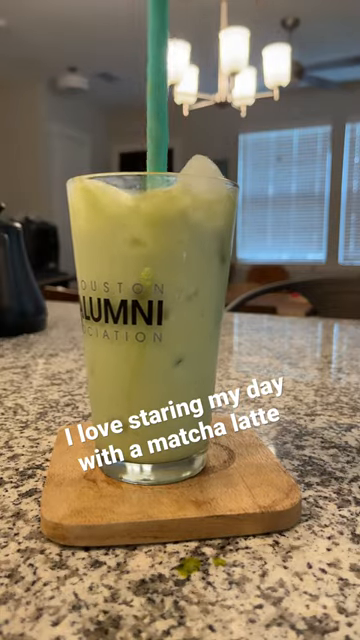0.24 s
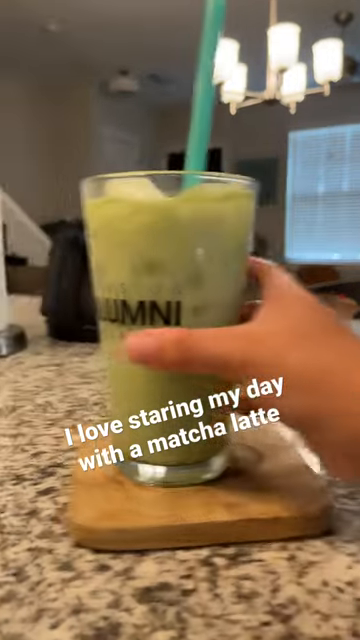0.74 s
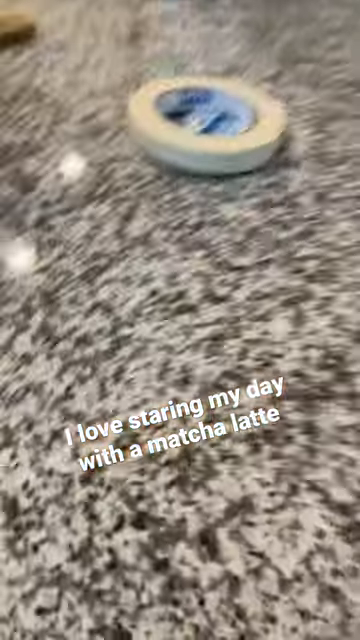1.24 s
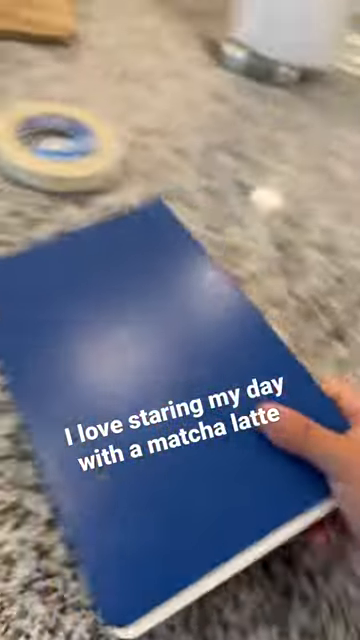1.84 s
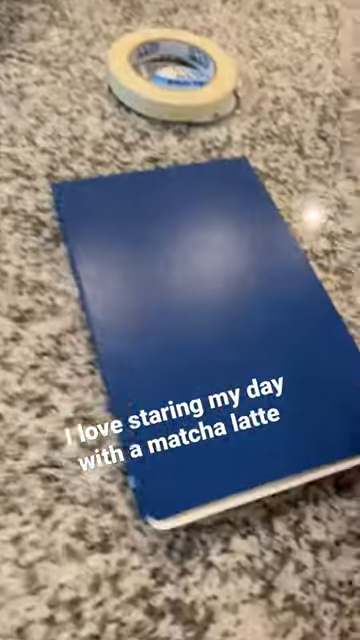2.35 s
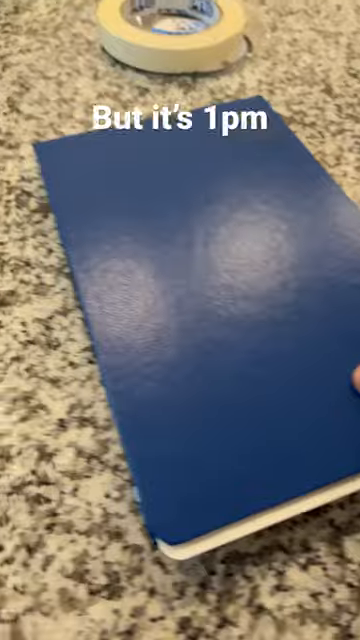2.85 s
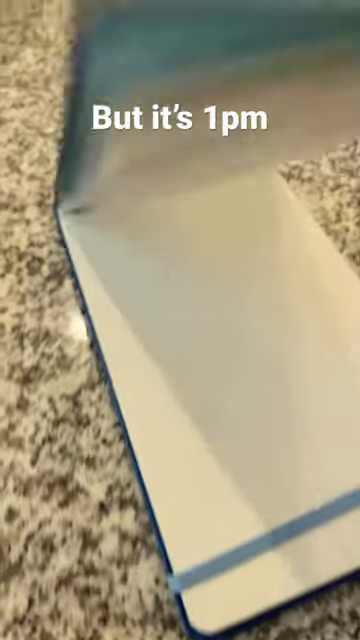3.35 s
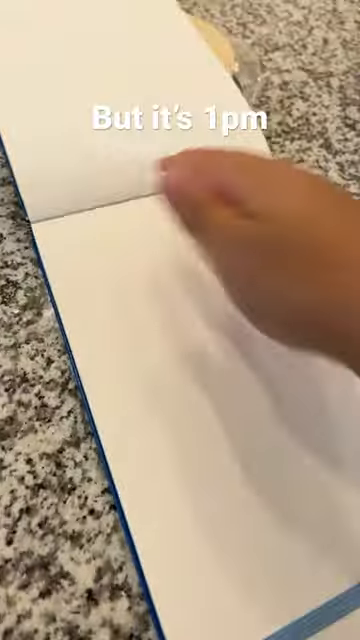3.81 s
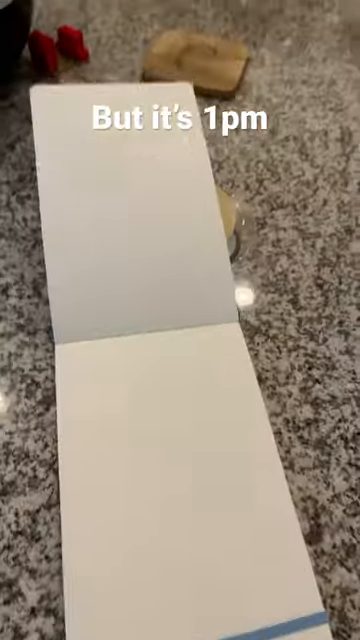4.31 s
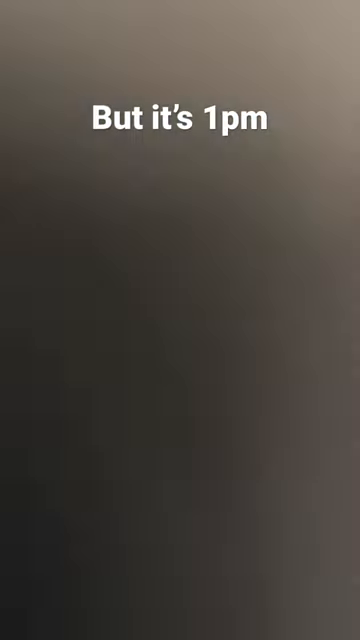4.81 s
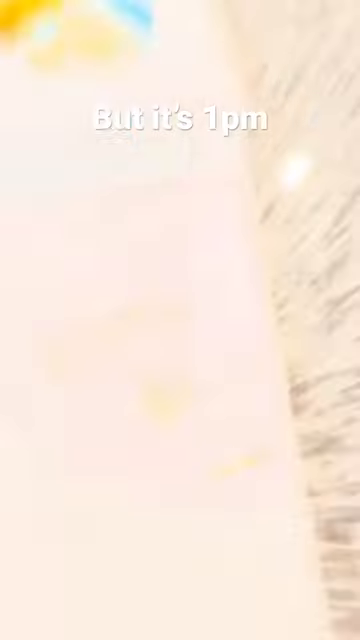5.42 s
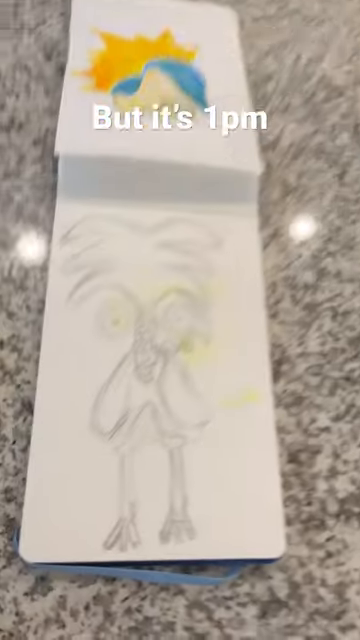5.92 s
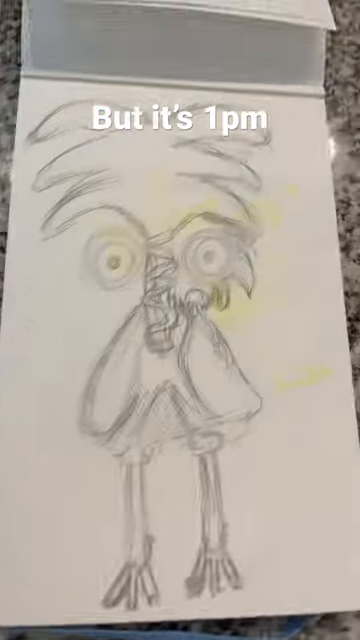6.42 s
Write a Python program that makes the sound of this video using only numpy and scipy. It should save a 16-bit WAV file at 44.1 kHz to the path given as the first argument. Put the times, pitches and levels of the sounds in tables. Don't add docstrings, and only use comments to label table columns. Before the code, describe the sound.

Close kitchen sounds: stirred ice clinking, a gritty coaster slide, a book slap on stone, a cover clap, then a very loud phone knock.

```python
import sys
import numpy as np
from scipy import signal
from scipy.fft import rfft, irfft
from scipy.io import wavfile
from scipy.ndimage import uniform_filter1d

SR = 44100
rng = np.random.default_rng(int(sys.argv[2]) if len(sys.argv) > 2 else 0)


def elevation(decibels):
    levels = np.asarray(decibels, float)
    return 10 ** (levels / 20)


def inscribe(sig):
    pcm = np.round(np.clip(np.atleast_2d(sig).T, -1, 1) * 32767)
    wavfile.write(sys.argv[1], SR, pcm.astype(np.int16))


N = 293706
FIRST = 56000


def evened(x):
    return x / np.sqrt(np.mean(x ** 2) + 1e-20)


def read(points, hz):
    f, value = np.transpose(points)
    return np.interp(np.log(hz + 1), np.log(f + 1), value)


def level(rows):
    return np.interp(np.arange(N) / SR, *np.transpose(rows))


def add(mix, s, sound):
    part = mix[max(round(s * SR), 0):][:len(sound)]
    part += sound[:len(part)]


def coloured(x, points):
    gain = elevation(read(points, np.fft.rfftfreq(len(x), 1 / SR)))
    return evened(irfft(rfft(x) * gain, len(x)))


def band(x, lo_hz, hi_hz):
    sos = signal.butter(2, [lo_hz, min(hi_hz, .45 * SR)], "bandpass", fs=SR, output="sos")
    return evened(signal.sosfilt(sos, x))


def resonate(x, hz, width):
    pole = np.exp((2j * np.pi * hz - np.pi * width) / SR)
    return 2 * signal.lfilter([1 - abs(pole)], [1, -pole], x).real


def sharp_band(x, hz, width):
    return evened(resonate(resonate(x, hz, width), hz, width))


def body(x, modes, wide_db):
    rings = sum((-1) ** k * elevation(db) * resonate(x, f, w) for k, (f, w, db) in enumerate(modes))
    return evened(rings + elevation(wide_db) * x)


def grit(per_s, spread_db, smooth, flicker_db=3.0, size=N):
    contact_size = elevation(spread_db * np.minimum(rng.exponential(1, size), 3.5))
    grain = contact_size * (rng.random(size) < per_s / SR)
    bursts = signal.lfilter([1], [1, -.93], grain) * rng.standard_normal(size)
    flicker = evened(uniform_filter1d(uniform_filter1d(rng.standard_normal(size), 700), 700))
    return evened((evened(bursts) + smooth * rng.standard_normal(size)) * elevation(flicker_db * flicker))


def ring(hz, t60, t):
    return np.sin(2 * np.pi * hz * t) * elevation(-60 * t / max(t60, .002))


def crack(t, t60, lo_hz, hi_hz):
    noise = band(rng.standard_normal(len(t)), lo_hz, hi_hz)
    return noise * elevation(-60 * t / t60) * np.minimum(t / 0.00023, 1) / 2


def strokes(rows, db=0, fade=1):
    bend = 1.2
    t = np.arange(0, N, 64) / SR
    s, peak_db, rise, fall = np.transpose(rows)[:4, :, None]
    slope = np.where(t < s, (s - t) / abs(rise), (t - s) / abs(fall * fade))
    gains = elevation(peak_db + np.reshape(db, (-1, 1)) - 20 * slope ** bend)
    return np.interp(np.arange(N) / SR, t, gains.sum(0))


def patchy(x, db):
    z = signal.stft(x, nperseg=512)[2]
    field = rng.standard_normal(z.shape[::-1]).T
    field = uniform_filter1d(uniform_filter1d(field, size=6, axis=0), size=9, axis=1)
    return signal.istft(z * elevation(db * evened(field)), nperseg=512)[1][:N]


def tinted(rows, x):
    out = np.zeros(N)
    for row in rows:
        span = slice(max(round((row[0] - .25) * SR), 0), round((row[0] + .35) * SR))
        out[span] += strokes([row])[span] * sharp_band(x[span], row[4], row[5])
    return out


# frequency in Hz, level in dB per Hz.
KITCHEN_AIR = [(15, -70.5), (25, -37), (80, -3.5), (121, -23), (150, -3.5), (197, -6.5), (321, -3.5),
               (399, -28), (433, -20), (927, -20.5), (1010, -20.5), (1780, -42), (12200, -47.5),
               (15200, -49.5), (16500, -68.5)]
# frequency in Hz, width in Hz, level in dB.
FRIDGE_HUMS = [(158.1, 6.1, -64), (159.3, 17, -65.5), (326, 168, -62), (9150, 59, -94), (15000, 250, -90.5)]
# time in seconds, pressure in dB.
GRIP = [(0.0, 4), (0.35, 0.5), (0.63, -1), (1.05, 9), (1.2, -0.5), (1.65, 0), (1.98, -2), (2.2, 7),
        (2.61, -1.5), (3.28, 0), (3.65, -2.5), (3.9, 2.5), (4.21, 2), (4.38, -6.5), (4.67, -0.5), (5.05, 2),
        (5.57, -4.5), (6.66, -4)]


def room_tone():
    air = elevation(-59.0) * patchy(coloured(rng.standard_normal(N), KITCHEN_AIR), 1.1)
    hum = sum(elevation(db) * sharp_band(rng.standard_normal(N), f, w) for f, w, db in FRIDGE_HUMS)
    grip_db = level(GRIP)
    rumble = elevation(-64 + 1.7 * grip_db) * band(grit(60, 3.3, 2.0, 2.5), 52, 200)
    creak = elevation(-61.5 + 0.9 * grip_db) * band(grit(200, 3.0, 1.5, 2.0), 170, 720)
    return air + hum + rumble + creak


# frequency in Hz, width in Hz, level in dB.
FULL_GLASS = [(1390, 200, -5.5), (2130, 280, 1), (2480, 100, -9), (2880, 63, -0.5), (3990, 140, -9),
              (5250, 68, 3), (7760, 210, -17)]
# peak in seconds, level in dB, seconds to rise 20 dB,
# seconds to fall 20 dB, fizz in dB.
STIRS = [
    (0.0, -46, .01, 0.14, -16),
    (.14, -52, 0.3, .13, 2),
    (.252, -53.5, 0.04, .05, -8),
    (.345, -49, 0.03, 0.24, 4.5),
]


def slush():
    stir_end_s, settle_s = 0.495, 0.045
    shuffle = body(band(grit(900, 2.2, 1.1, 1.5, size=FIRST), 1000, 4070), FULL_GLASS, -7.0)
    fizz = band(grit(2500, 2.5, 1.2, size=FIRST), 4260, 6960)
    fizz_db = np.transpose(STIRS)[4]
    wet = strokes(STIRS)[:FIRST] * shuffle + 0.51 * strokes(STIRS, fizz_db)[:FIRST] * fizz
    settle = elevation(-20 * np.maximum(np.arange(FIRST) / SR - stir_end_s, 0) / settle_s)
    return np.pad(settle * wet, (0, N - FIRST))


# start in seconds, peak in dB, low ring in Hz, high ring in Hz,
# high ring in dB.
STIR_CLINKS = [(0.0004, -37, 1380, 4050, -13), (0.062, -31, 1360, 4270, -10),
               (0.0867, -29, 1360, 3570, -5.5), (0.1, -38, 1400, 3600, -6), (0.1256, -45, 1510, 3490, 4),
               (0.179, -34, 2460, 4000, -22), (0.2324, -29, 1500, 3760, -24), (0.249, -30, 2870, 3940, -12),
               (0.2694, -52, 1570, 3500, 7), (0.3066, -23.5, 2480, 3940, -6),
               (0.3334, -27.5, 1510, 3600, 4), (0.343, -30, 2460, 3700, -3),
               (0.3644, -19.5, 2130, 3990, -8), (0.385, -23, 2000, 3640, -10.5),
               (0.426, -39, 1660, 4100, 1.5)]
# start in seconds, peak in dB, high ring in Hz,
# high ring in dB, tick in dB.
RIDE_CLINKS = [(0.5788, -35.5, 6400, -16, -24), (0.6094, -47, 3570, -15, 2), (0.6586, -51, 3500, 0, -12),
               (0.6845, -49, 3520, 2, -12), (0.89, -46, 5600, 0, -4), (0.7405, -33, 3230, -3, 3),
               (0.807, -38, 5440, -4, -12), (0.822, -41.5, 3230, 8, -15), (0.945, -37, 3500, 1, -20),
               (0.948, -32, 3500, 1, -30), (0.951, -37, 3400, 0, -25), (0.971, -39, 3380, -3, 0),
               (1.0025, -48, 3040, 6, -8), (1.0158, -46, 3240, 12, 6), (1.0195, -46, 3300, 11, 4),
               (1.0235, -48, 3300, 9, 4), (1.075, -44, 3680, 2, 3), (1.1004, -39, 3400, 5.5, -6),
               (1.1525, -32.5, 3200, -1, -8.5), (1.1673, -24, 6800, -7, -8), (1.188, -37, 3500, -1, -10),
               (1.1915, -38, 3420, 0, -8), (1.222, -36.5, 3300, 7.5, 5)]


def clinks():
    out, t = np.zeros(N), np.arange(3000) / SR
    rise = np.minimum(t / 0.00033, 1)
    low_t60, high_t60 = .012, .009
    stirred = [row + (-31,) for row in STIR_CLINKS]
    riding = [(s, db, 1380, *rest) for s, db, *rest in RIDE_CLINKS]
    for s, db, low_hz, high_hz, high_db, tick_db in stirred + riding:
        high = ring(high_hz, high_t60, t) - 0.39 * ring(high_hz * 1.18, 0.0041, t)
        rings = 0.46 * ring(low_hz, low_t60, t) + elevation(high_db) * high
        snap = elevation(tick_db + 2.0) * crack(t, 0.0039, 4800, 15000)
        snap = snap + elevation(high_db - 1.5) * crack(t, high_t60, 2600, 7200)
        add(out, s - .0006, elevation(db) * (rise * rings + snap))
        skid = crack(t[:900], 0.029, 0.79 * low_hz, 1.23 * high_hz)[::-1]
        add(out, max(s - 900 / SR, 0), elevation(db - 12.0) * skid)
    return np.array([out, elevation(-9) * out])


# start in seconds, level in dB, start pitch in Hz,
# end pitch in Hz, length in seconds.
THUMPS = [
    (.09, -56, 534, 526, 0.13),
    (.31, -40.5, 243, 224, 0.02),
    (0.614, -48, 76, 60, 0.064),
    (2.198, -40.5, 92, 68, 0.14),
    (4.135, -48, 88, 80, 0.045),
    (4.304, -47.5, 80, 70, 0.022),
    (4.9185, -11.5, 86, 63.5, 0.04),
    (5.08, -49.5, 84.4, 70, 0.067),
    (5.226, -38, 71, 60, 0.02),
    (6.356, -47, 91.5, 70, 0.022),
]


def thumps():
    out = np.zeros(N)
    for s, db, start_hz, end_hz, length in THUMPS:
        u = np.linspace(0, 1, round(length * SR))
        turns = np.cumsum(start_hz + (end_hz - start_hz) * u) / SR
        swell = np.sin(np.pi * u ** 0.53) * (1 - .5 * u)
        add(out, s, elevation(db + 0.5) * np.sin(2 * np.pi * turns) * swell)
    return out


# time in seconds, scrape level in dB.
COASTER_SPEED = [(.49, -68), (.57, -68), (.6, -54), (.66, -60), (1.024, -47.5), (1.03, -53.5), (1.17, -46),
                 (1.212, -55), (1.23, -46.5)]
# frequency in Hz, width in Hz, level in dB.
COASTER = [(3500, 280, -2.5), (4580, 160, -2.5), (5770, 420, -4), (7100, 170, 1), (7800, 210, -2),
           (9700, 260, -4), (10500, 370, -13), (11700, 370, -10)]
# frequency in Hz, width in Hz, level in dB.
WOOD = [(660, 110, 2), (1280, 230, -4)]


def slide():
    t, speed_db = np.arange(FIRST) / SR, level(COASTER_SPEED)[:FIRST]
    moving = (t > COASTER_SPEED[0][0]) * (t < CUTS[0][0])
    extra_db = speed_db + 54
    scrape = elevation(speed_db) * body(band(grit(900, 2.6, 0.9, 1.6, size=FIRST), 1800, 13000), COASTER, -13.0)
    slop = elevation(-63 + 0.68 * extra_db) * band(grit(900, 2.8, 1.2, size=FIRST), 900, 2900)
    drum = elevation(-59 + 0.94 * extra_db) * body(band(grit(300, 4.0, .7, size=FIRST), 400, 1800), WOOD, -10)
    hiss = elevation(-63.5 + 1.06 * extra_db) * band(grit(1800, 2.2, 1.8, 1.5, size=FIRST), 5600, 16000)
    return np.pad(moving * (scrape + slop + drum + hiss), (0, N - FIRST))


# start in seconds, peak in dB,
# knock in Hz, slap in dB, tick in dB.
TAPS = [(0.579, -38.5, 649, -18, -15), (0.598, -43, 425, -17, -5), (0.621, -39.5, 400, -25, -14),
        (1.065, -38.5, 656, -16, -9), (1.165, -35.5, 643, -16, -1), (1.219, -34, 580, -6, 1.5),
        (2.079, -40, 736, -1, -18), (2.091, -42, 580, 0, -11), (2.896, -44.5, 584, -6, -27),
        (3.421, -50, 560, 4, -8), (3.544, -58, 1260, 14, 13), (4.052, -46, 660, 9, -28),
        (4.644, -38, 590, -25.5, -39), (4.757, -45.5, 425, -22.5, -30), (5.218, -36.5, 640, 9, -15),
        (6.345, -28.5, 720, -8, -19), (6.429, -40, 620, -4, -10), (6.656, -49, 1170, 0.5, -0.5)]


def taps():
    near, dry, t = np.zeros(N), np.zeros(N), np.arange(3000) / SR
    rise = np.minimum(t / 0.00033, 1)
    for s, db, knock_hz, slap_db, tick_db in TAPS:
        slap_hz = 2.26 * knock_hz
        add(near, s - .0004, elevation(db + tick_db + 8.5) * crack(t, 0.0073, 2200, 10500))
        slap = 1.57 * rise * (ring(slap_hz, 0.0057, t) - 0.32 * ring(slap_hz * 1.7, 0.0037, t))
        slap = slap + 0.52 * crack(t, 0.014, 870, 3400)
        add(dry, s + 0.00022, elevation(db + slap_db) * slap)
        knock = 1.14 * ring(knock_hz, 0.024, t) - 0.47 * ring(knock_hz * 0.61, 0.044, t)
        add(near, s + 0.00096, elevation(db) * rise * knock)
    return np.array([near + dry, elevation(-13) * (near + .3 * dry)])


# peak in seconds, level in dB, seconds to rise 20 dB,
# seconds to fall 20 dB, dull part in dB.
STROKES = [(1.52, -68.5, 0.3, 0.95, -2), (2.039, -51, 0.23, 0.19, -9.5), (2.11, -63, 0.07, 0.19, -1),
           (2.5, -71, 0.55, 0.5, 5), (2.86, -71, .5, 0.4, 1.5), (3.19, -63, 0.04, 0.2, -11),
           (3.288, -56, 0.035, 0.19, -11), (3.58, -62.5, 0.25, 0.26, -3.5), (3.697, -63, .35, 0.1, -1),
           (3.82, -65, 0.08, 0.31, 1), (4.1, -70, 0.26, 0.47, 13.5), (4.44, -72.5, .5, 0.1, 2.5),
           (4.65, -79.5, -0.14, 0, 8), (4.84, -78, 0.06, 0.3, -7), (4.98, -66, 0.07, 0.1, -3),
           (5.37, -65, 0.17, 0.52, -2.5), (5.7, -75, 0.03, .09, -15), (6.1, -82.5, -0.3, 0.7, -4),
           (6.58, -80.5, 0.26, 0.5, -1.5)]
# peak in seconds, level in dB, rise in seconds, fall in seconds,
# pitch in Hz.
HOLLOW = [
    (2.1, -62, 0.027, 0.026, 1580),
    (3.68, -58.5, 0.05, 0.07, 1600),
    (4.06, -52, .015, 0.11, 1490),
    (5.37, -68, 0.059, .13, 2530),
]
# peak in seconds, level in dB, rise in
# seconds, fall in seconds, frequency in Hz, width in Hz.
SCUFFS = [(3.2, -65, .05, .07, 2000, 1200), (3.57, -63, .02, .06, 3220, 1600),
          (3.66, -66, .06, .05, 4450, 800), (4.6, -78, .2, .3, 1500, 600),
          (6.375, -73, .03, .08, 5900, 1400), (6.385, -71, .04, .05, 2400, 1500),
          (6.428, -65, .025, .008, 2300, 1500), (6.45, -75, .02, .06, 6000, 1800),
          (6.4295, -56, .003, .005, 6000, 1400), (6.431, -56, .004, .007, 2500, 900),
          (.605, -54, 0.017, .03, 6100, 1100), (5.21, -64, 0.028, 0.017, 1500, 1500),
          (.83, -55, .015, .06, 5700, 600), (.83, -56, .015, .05, 3350, 400),
          (1.15, -56, .06, .05, 6000, 900), (1.13, -54, .1, .15, 700, 200), (4.96, -60, .03, .12, 2050, 90),
          (3.422, -60, .004, .012, 4500, 1200), (3.295, -62, .03, .06, 6000, 1200),
          (4.055, -50, .004, .03, 1500, 500), (4.105, -56, .01, .03, 1300, 900),
          (.95, -46, .006, .015, 1250, 500), (.975, -45, .005, .012, 900, 600),
          (1.1, -45, .005, .015, 750, 500), (1.19, -45, .005, .015, 1100, 900),
          (.932, -50, .006, .01, 1200, 500), (1.003, -49, .005, .01, 1300, 700),
          (2.22, -42, .015, .04, 900, 250), (2.24, -41, .04, .07, 290, 90)]
# peak in seconds, level in
# dB, rise in seconds, fall in seconds.
PUFFS = [
    (.61, -58, .03, 0.034),
    (2.5, -79, .2, .12),
    (4.3, -80, .2, .15),
    (2.25, -72, .05, .1),
    (3.73, -68, .15, 0.089),
    (4.975, -63, .06, .03),
]


def rub():
    dull_db = np.transpose(STROKES)[4]
    hiss, dull, airy = (grit(4000, 2.2, 2.0, .7) for _ in range(3))
    hump = strokes(STROKES) * body(band(hiss, 3200, 8400), [(6040, 5100, 0.93)], -2)
    low = strokes(STROKES, dull_db, 0.8) * band(dull, 830, 3100)
    air = (strokes(STROKES, -14 - .25 * dull_db) + strokes(PUFFS)) * band(airy, 7700, 15400)
    hollow = tinted([row + (300,) for row in HOLLOW], dull)
    return patchy(hump + low + air, 1.4) + hollow + tinted(SCUFFS, hiss)


# start in seconds, level in dB.
SPECKS = [
    (1.83, -60),
    (2.585, -66),
    (5.465, -59),
    (5.73, -61),
    (6.014, -65),
    (6.25, -68),
]


def specks():
    out, t = np.zeros(N), np.arange(3000) / SR
    for s, db in SPECKS:
        add(out, s, elevation(db) * crack(t, .05, 7000, 15500))
    return out


def slam(blows, modes, colour, room_db, spread_db, crack_hz, crack_t60, pushes_back=None):
    solid, loose, far, t = np.zeros(N), np.zeros(N), np.zeros(N), np.arange(6000) / SR
    rings = sum((-1) ** k * elevation(db) * ring(f, t60, t) for k, (f, db, t60) in enumerate(modes))
    for k, (s, db, ms, crack_db, scatter_db) in enumerate(blows):
        push = np.sin(np.pi * np.clip(t[:600] * 1000 / ms, 0, 1))
        sign = -1 if k == pushes_back else 1
        add(solid, s, sign * elevation(db) * signal.fftconvolve(rings, push / push.sum()))
        add(loose, s, elevation(crack_db) * crack(t, crack_t60, 1600, crack_hz))
        scatter = coloured(rng.standard_normal(len(t)), colour) * elevation(-60 * t / .05)
        add(loose, s, elevation(scatter_db) * scatter * np.minimum(t / 0.0005, 1))
    solid = signal.sosfilt(signal.butter(2, 130, "highpass", fs=SR, output="sos"), solid)
    click = coloured(signal.unit_impulse(400, "mid"), colour)
    add(far, blows[1][0] - .004, elevation(blows[1][4] + spread_db) * click)
    return np.array([solid + loose, elevation(room_db) * solid + far])


# start in seconds, force in dB, contact in ms, crack in dB, scatter in dB.
BOOK_BLOWS = [
    (2.1924, -19.5, 0.21, -22, -31),
    (2.1945, -13, 1.44, -36, -27.5),
    (2.2032, -30, 0.46, -45, -28),
]
# mode in Hz, level in dB, T60 in seconds.
BOOK = [(280, -0.5, 0.028), (760, 4.5, 0.016), (1260, 0, 0.0038), (1690, 1, 0.0084)]
# frequency in Hz, level in dB per Hz.
BOOK_SCATTER = [(59, -47), (100, -26), (278, -4.5), (400, -20), (870, -13), (1700, -24), (2730, -36),
                (6450, -34.5), (12000, -49), (15600, -80), (22000, -120)]


def book_drop():
    return slam(BOOK_BLOWS, BOOK, BOOK_SCATTER, room_db=-8, spread_db=-0.5, crack_hz=6600, crack_t60=0.013)


# start in seconds, force in dB, contact in ms, crack in dB, scatter in dB.
COVER_BLOWS = [
    (3.8447, -34, .3, -20.5, -29.5),
    (3.8512, -28, .3, -23, -26),
    (3.8528, -16, 0.36, -30, -21.5),
    (3.8560, -13, 0.52, -34, -23.5),
    (3.8635, -27, .5, -36, -31),
    (3.8850, -35.5, .25, -19.5, -33),
    (3.8970, -40, .3, -29, -33),
]
# mode in Hz, level in dB, T60 in seconds.
COVER = [(302, -10, 0.036), (506, -17, 0.016), (767, -1, 0.026), (1074, -12.5, 0.02), (1582, -1, 0.025)]
# frequency in Hz, level in dB per Hz.
COVER_SCATTER = [(90, -41), (200, -3.5), (500, -5), (780, 0.5), (1400, -1.5), (2600, -10), (5700, -20.5),
                 (12000, -38), (16000, -69)]


def cover_fall():
    return slam(COVER_BLOWS, COVER, COVER_SCATTER, room_db=-17, spread_db=3.5, crack_hz=5800,
                crack_t60=0.017, pushes_back=3)


def squeezed_air():
    t = np.arange(1500) / SR
    rush = band(rng.standard_normal(len(t)), 400, 2200) * elevation(-12 - 60 * t / 0.027)
    out = np.zeros(N)
    add(out, 4.9135 - len(t) / SR, rush[::-1])
    return out


# start in seconds, force in dB, contact in ms,
# crack in dB, scatter in dB.
PHONE_BLOWS = [
    (4.9128, -8, 0.65, -31, -19),
    (4.9137, -14, 0.3, -17, -28),
    (4.9157, -2.5, .6, -27, -30),
    (4.9022, -21, .7, -48, -36),
    (4.9062, -21, .3, -36, -32),
    (4.9095, -19, .25, -36, -30),
]
# mode in Hz, level in dB, T60 in seconds.
PHONE = [(492, 2.5, .0135), (739, -5, 0.034), (308, -9.5, 0.033), (2090, -7.5, 0.013), (171, -15, 0.051),
         (3058, -8, 0.006), (1950, -30.5, .25), (2310, -32.5, .2), (600, -33.5, 0.24)]
# frequency in Hz, level in dB per Hz.
PHONE_SCATTER = [(88, -52.5), (150, -21), (177, -20), (246, -6), (583, -5), (1400, -18), (1920, -13),
                 (2030, -21.5), (12000, -37.5), (15600, -66.5), (22000, -120)]


def phone_landing():
    return slam(PHONE_BLOWS, PHONE, PHONE_SCATTER, room_db=-28.5, spread_db=-3, crack_hz=13000,
                crack_t60=0.0062, pushes_back=0)


# mode in Hz, level in dB, T60 in seconds.
RIM = [(3100, -12, .007), (4900, -21, .005), (7000, -16, .005), (9000, -14, .005), (10900, -21, .004),
       (13500, -21, .004)]


def rim_snap():
    out, t = np.zeros(N), np.arange(1500) / SR
    rings = sum(elevation(db) * ring(f, t60, t) for f, db, t60 in RIM)
    add(out, 4.9136, rings * np.minimum(t / .0004, 1))
    return out


# frequency in Hz, T60 in seconds.
ECHO = [(100, 0.27), (300, 0.37), (800, 0.52), (2000, 0.52), (5000, 0.63), (12000, 0.4)]


def echo(x):
    count = (SR - 301) // 20
    reflections = np.zeros(SR)
    reflections[np.arange(300, SR - 20, 20) + rng.integers(0, 20, count)] = rng.choice([-1., 1.], count)
    hz, t, z = signal.stft(reflections, SR, nperseg=256)
    decay = elevation(-60 * t / np.maximum(read(ECHO, hz), .05)[:, None])
    tail = signal.istft(z * decay, SR, nperseg=256)[1]
    return signal.fftconvolve(x, tail / np.linalg.norm(tail))[:N]


def scene():
    hits, sent = clinks() + taps() + book_drop() + cover_fall() + phone_landing()
    shot = np.searchsorted([a for a, b in CUTS], np.arange(N) / SR)
    room = sum((shot == k) * echo((shot == k) * sent) for k in range(3))
    rubbing = slush() + slide() + rub()
    return (room_tone() + rubbing + hits + room + thumps() + specks() + squeezed_air() + rim_snap())[None]


def low_pass(x):
    return signal.sosfilt(signal.butter(12, 16680, fs=SR, output="sos"), x)


# start in seconds, end in seconds.
CUTS = [
    (1.2352, 1.2700),
    (5.2352, 5.2533),
]


def record(dry):
    t = np.arange(N) / SR
    heard = signal.sosfilt(signal.butter(3, 38, "highpass", fs=SR, output="sos"), dry)
    heard = signal.oaconvolve(heard, signal.firwin(255, 16100, fs=SR)[None], "same")
    gap = sum((t > a) * (t < b) for a, b in CUTS)
    residue = elevation(-88) * band(band(rng.standard_normal(N), 100, 900), 100, 900)
    return low_pass(heard * uniform_filter1d(1. - gap, 30) + gap * residue)


dry = scene()
out = record(dry)
inscribe(out)
```